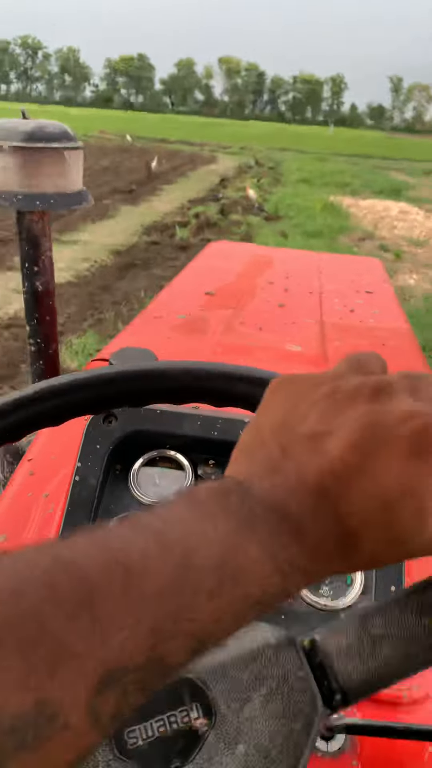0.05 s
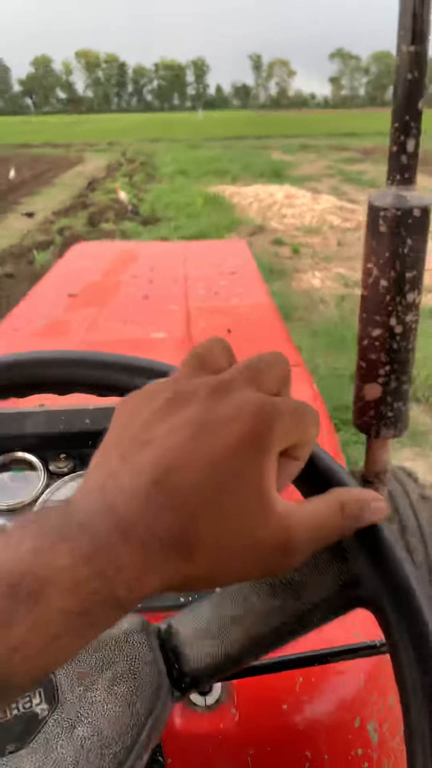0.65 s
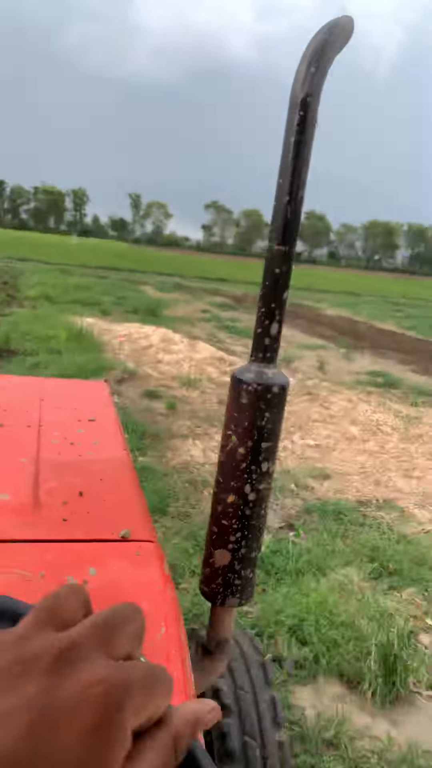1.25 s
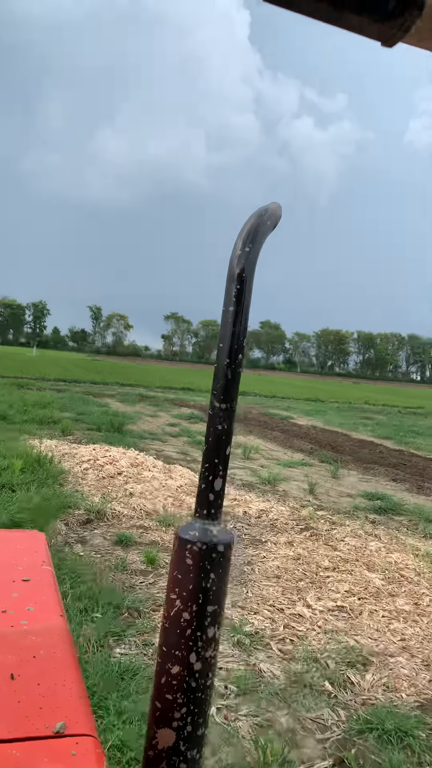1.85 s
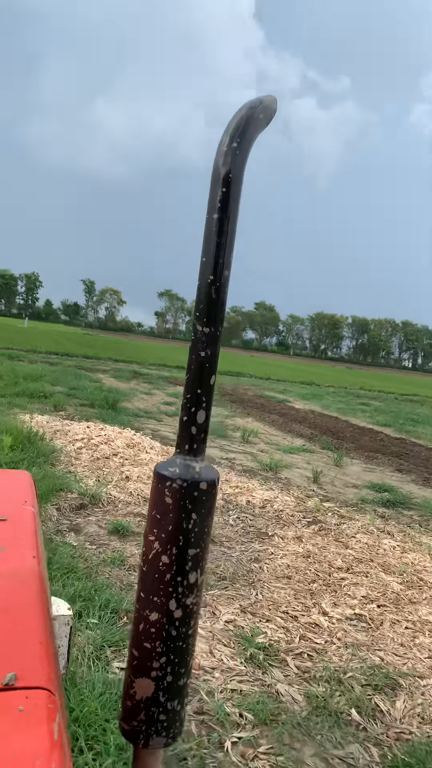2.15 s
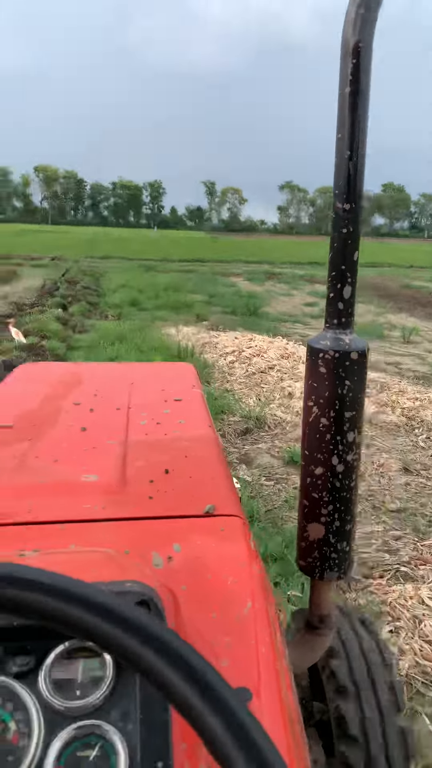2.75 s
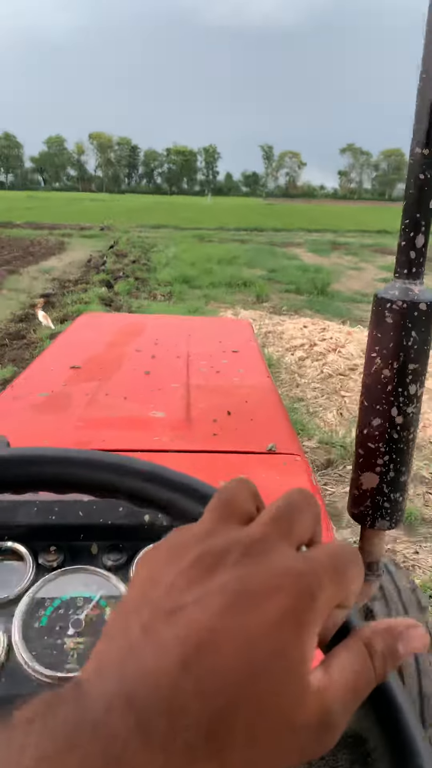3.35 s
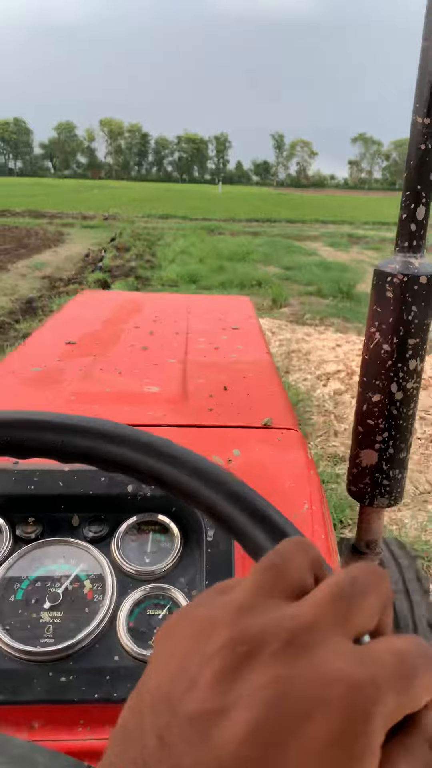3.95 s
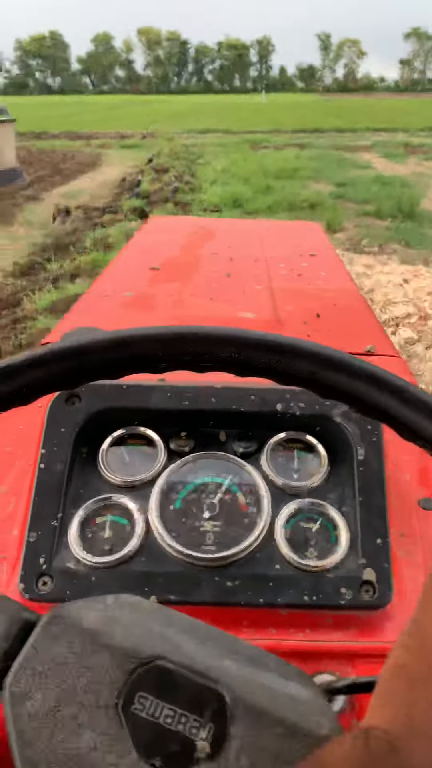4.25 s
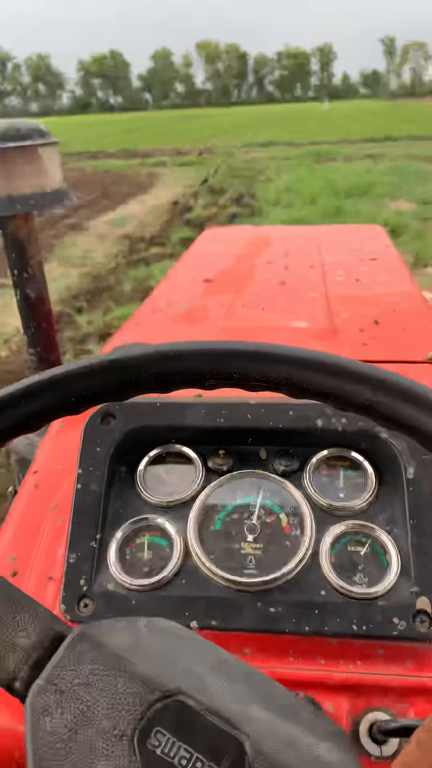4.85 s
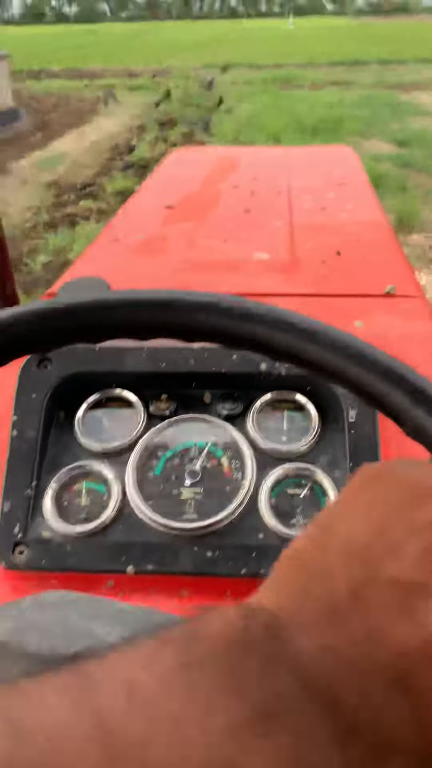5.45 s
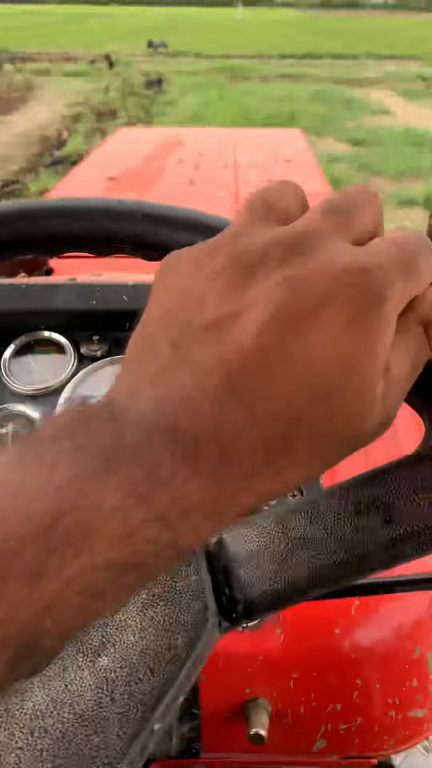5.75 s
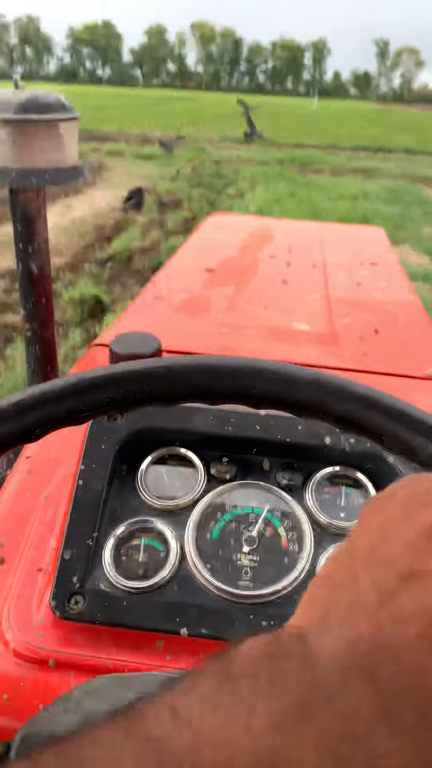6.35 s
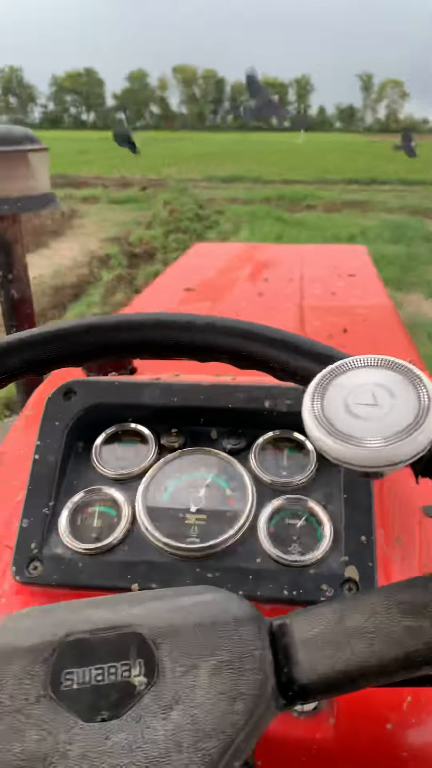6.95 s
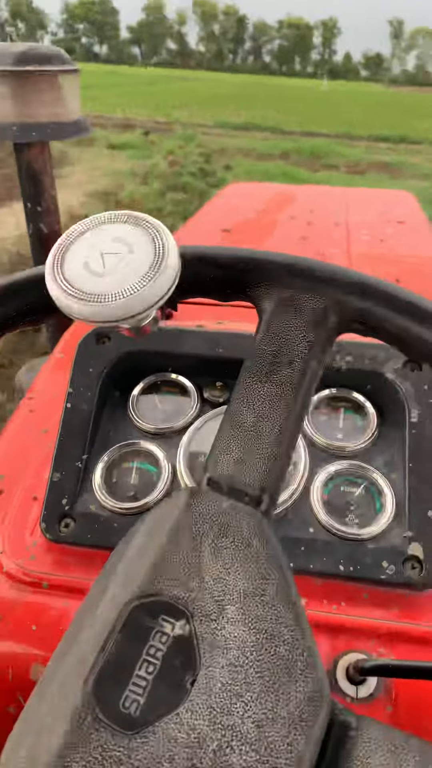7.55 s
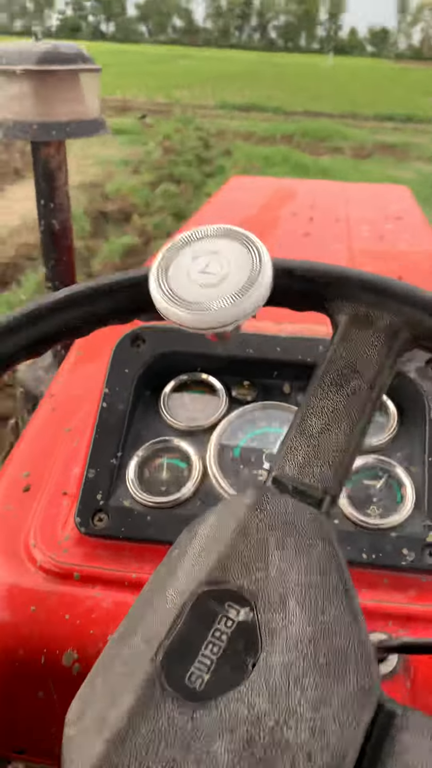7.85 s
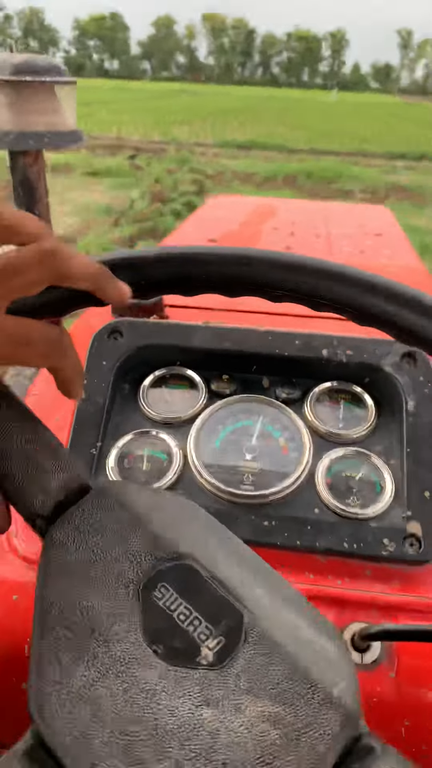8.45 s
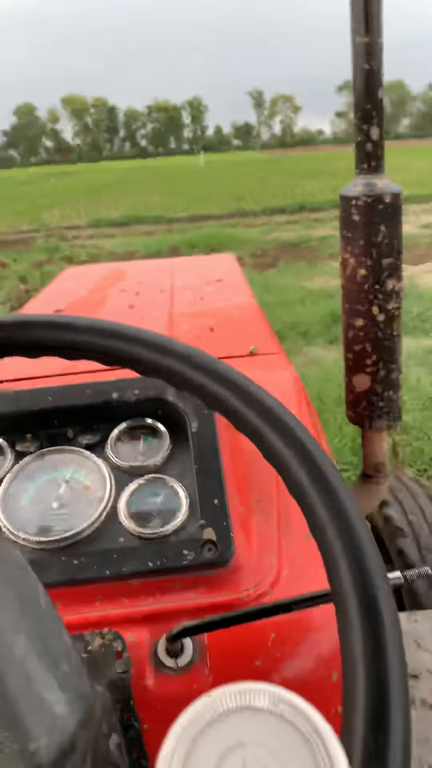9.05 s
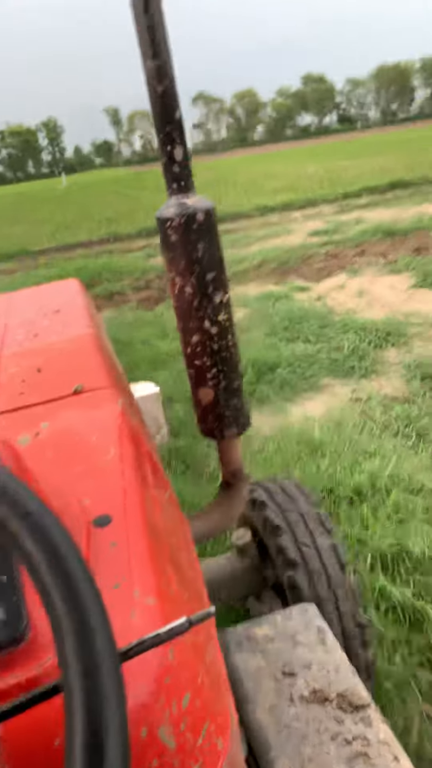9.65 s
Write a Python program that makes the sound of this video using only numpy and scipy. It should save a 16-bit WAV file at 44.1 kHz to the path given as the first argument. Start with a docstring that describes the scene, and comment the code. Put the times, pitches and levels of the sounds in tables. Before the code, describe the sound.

Close to the driver's seat in an open field, a diesel tractor engine chugs and clatters. Its note falters and sags, then the exhaust turns hard and raspy as the speed recovers. It settles into a steady pull broken by short drops and swells. Loose metal parts clink and knock, mostly in the second half, and underneath are the rush of the cooling fan and the low rumble of a harrow in the soil.

```python
"""A two-cylinder diesel tractor pulls a harrow over a field, on two close microphones at the seat.
Ahead, the upright exhaust booms on every firing; as the governor opens up it barks, spits and rings.
In the fuel cuts it falls quiet, leaving the block's clatter, the fan, gear whine and the engine's hum.
Loose tinwork rattles nearby, and behind the seat the harrow's discs thud and scrape through the soil."""
import sys
import numpy as np
from scipy import signal
from scipy.fft import rfft, irfft, next_fast_len
from scipy.io import wavfile
from scipy.ndimage import uniform_filter1d

SR = 44100
rng = np.random.default_rng(int(sys.argv[2]) if len(sys.argv) > 2 else 0)


def output_pcm(signal):
    """Save a mono or channel-first signal as 16-bit PCM at the path in sys.argv[1].

    Samples are clipped to [-1, 1] before scaling.
    """
    pcm = np.clip(np.atleast_2d(signal).T, -1, 1) * 32767
    wavfile.write(sys.argv[1], SR, np.round(pcm).astype(np.int16))


N = 428199
TIME = np.arange(N) / SR
FFT_SIZE = next_fast_len(N + 8192, True) // 2 * 2
HZ = np.fft.rfftfreq(FFT_SIZE, 1 / SR)

# discs in the soil behind the seat: time_s, rumble_db, hiss_db
HARROW_LEVELS = [(0, -30, -47), (3.7, -33, -43), (4.4, -28, -50), (6.2, -27, -54), (7, -33, -55),
                 (7.8, -27, -45), (8.6, -29.5, -45), (9.2, -29, -43), (9.71, -55, -38)]
# tone of the clods and of the grit: freq_hz, gain_db
CLOD_SPECTRUM = [(100, -26), (230, 8.5), (340, 3), (600, -4.5), (1200, -21), (5000, -59)]
GRIT_SPECTRUM = [(1000, -27), (2600, -28), (5000, -28), (9500, 15), (13000, 24)]
# linkage and tinwork shaken by rough ground: time_s, level_db
JINGLE_LEVELS = [(0, -34), (3.5, -38.5), (4.3, -33.5), (5.2, -37), (6.1, -32), (8.3, -33), (9.71, -30)]
# loose pins and tinwork: pitch_hz
PIN_PITCHES = [1340, 1450, 1540, 1664, 1797, 1900, 2020, 2096, 2150, 2230]
# loose metal knocking as the tractor jolts: start_s, level_db, pitch_hz, t60_s
METAL_RATTLES = [(.057, -12, 2000, 0.016), (4.338, -21, 2100, 0.094), (5.266, -19, 1970, 0.13),
                 (5.858, -25, 2190, .08), (6.099, -18, 2020, .08), (6.154, -16, 1980, 0.07),
                 (6.199, -17, 2210, 0.093), (6.252, -15, 2120, .08), (6.454, -20.5, 1920, .08),
                 (6.638, -17, 2120, .08), (6.684, -19, 2100, .08), (7.012, -20, 2130, .08),
                 (7.278, -21, 2130, .1), (8.325, -18, 1950, 0.12), (8.428, -20, 2040, .05),
                 (9.007, -22, 2150, .04)]
# a dry joint chirping: start_s, level_db, pitch_hz, t60_s
JOINT_SQUEAKS = [(5.338, -26.5, 4680, 0.1)]
# dry clacks of hard exhaust firings as the engine takes up the load: start_s, level_db, centre_hz, t60_s
EXHAUST_CLACKS = [(.821, -23, 8000, .04), (.826, -23, 9000, .05), (.875, -29, 7500, .06),
                  (1.114, -28, 9000, .06), (1.423, -26, 9000, .05)]
# dull bumps under the seat: start_s, level_db, pitch_hz, decay_s
CHASSIS_BUMPS = [(3.86, -9, 114, 0.0076), (4.262, -14.5, 204, .009)]
# air from the cooling fan: freq_hz, gain_db
FAN_SPECTRUM = [(200, -13), (1500, 5.5), (3500, 8.5), (5000, 0.5), (7500, 4), (13000, -2.5)]
# tones of the running gear: pitch_hz, level_db
GEAR_WHINES = [(7731, -62), (3566, -58.5)]
# hum of the reciprocating masses: crank_multiple, level_db
SHAKE_ORDERS = [(1, -37), (2, -50.5), (3, -31), (5, -30.5), (6, -35.5)]
# clatter before the fuel raises or lowers it: time_s, level_db
CLATTER_LEVELS = [(0, -22.5), (1.9, -21), (3.3, -22.5), (5.4, -21.5), (7, -23), (9.71, -20.5)]
# tone of block and transmission: freq_hz, gain_db
BLOCK_SPECTRUM = [(20, -44), (42, 9), (100, 12.5), (150, 7.5), (220, 7), (320, 1.5), (460, -2), (680, 0.5),
                  (900, -1), (1200, 1.5), (1700, -4.5), (2250, -7), (2550, -8.5), (3000, -14),
                  (6000, -17.5), (15000, -40)]
# ringing castings and panels: pitch_hz, width_hz, boost_db
PANEL_MODES = [(2130, 90, 8), (2618, 50, 5.5), (3560, 25, 9)]
# crank speed the governor holds while it feeds fuel, one firing a turn: time_s, speed_hz
CRANK_SPEEDS = [(0, 42.242), (.6, 39.781), (1, 40.217), (1.8, 34.615), (2.2, 36.181), (2.4, 38.571),
                (2.8, 41.233), (3, 43.514), (4, 43.796), (4.8, 42.473), (5.6, 42.201), (5.8, 40.87),
                (7.4, 39.949), (7.6, 41.508), (8, 40.929), (8.2, 42.784), (8.4, 40.163), (9.71, 41.203)]
# the engine coasts: start_s, end_s, share_cut
FUEL_CUTS = [(.03, .13, 1), (.7, .82, 1), (.92, 1.06, 1), (1.21, 1.34, 1), (1.48, 1.63, 1), (1.78, 1.94, 1),
             (4.225, 4.35, .56), (4.5, 4.72, 1), (5.11, 5.21, 1), (5.42, 5.53, 1), (6.31, 6.45, 1),
             (7.63, 7.73, 1), (8.14, 8.3, 1)]
# the governor opens up: start_s, length_s, rasp_db, fade_s
GOVERNOR_SURGES = [(0.133, 0.21, -36, 0.091), (0.494, 0.23, -37, .06), (0.797, .12, -35.5, 0.018),
                   (1.068, 0.11, -32.5, 0.031), (1.33, 0.14, -32.5, .04), (1.608, 0.17, -31.5, 0.019),
                   (1.924, 1.17, -29, 0.041), (4.343, 0.17, -40, 0.07), (4.718, .35, -33.5, 0.056),
                   (5.168, 0.23, -35, 0.055), (5.504, .24, -32.5, 0.054), (5.798, 0.24, -34, 0.11),
                   (6.126, 0.18, -34, 0.058), (6.441, 0.29, -35, 0.044), (7.403, 0.24, -33, 0.072),
                   (7.873, 0.29, -36.5, 0.089), (8.471, 0.23, -36.5, 0.057), (8.87, 0.17, -38.5, 0.049)]
# steady pull of the harrow between surges: time_s, fuel_db, rasp_db
STEADY_LOAD = [(0, -18, -38.5), (1.8, -21, -65.5), (3.1, -18, -38.5), (4.15, -18, -44.5), (5.8, -19.5, -49),
               (6.9, -18, -40), (7.3, -19, -45), (8.4, -19.5, -60), (9.25, -18.5, -40), (9.71, -19, -41.5)]
# the hardest firings spit at the lip, then knock in the pipe: start_s, spit_db, spit_hz, knock_db
HARD_BLOWS = [(.822, -27, 7000, -27), (.874, -30, 7600, -28), (1.114, -29, 7000, -28),
              (1.396, -25, 7900, -28), (1.629, -23, 6400, -26.5), (1.688, -21, 7300, -23.5),
              (1.718, -30, 7800, -22), (1.964, -15.5, 6900, -26), (2.057, -24, 8000, -22),
              (2.142, -17, 7900, -22), (2.198, -17, 7400, -25), (2.227, -18, 8000, -23),
              (2.281, -17, 7300, -25), (2.334, -23, 7800, -22.5), (2.388, -18, 7900, -22),
              (2.439, -17, 7500, -22.5), (4.947, -19, 7700, -34), (6.661, -19, 7300, -33)]
# crack of a hard blowdown: freq_hz, gain_db
CRACK_SPECTRUM = [(150, -30), (400, -4.5), (620, -2), (900, -9.5), (1300, -6), (2000, -6), (2500, -8),
                  (3000, -22), (6000, -24), (16000, -45)]
# resonances of the exhaust pipe: pitch_hz, width_hz, boost_db
PIPE_MODES = [(785, 34, 18), (1125, 24, 25), (1490, 60, 10), (1790, 60, 10)]
# sizzle at the stack's lip: pitch_hz, width_hz, gain_db
LIP_MODES = [(7700, 25, 10), (8000, 130, 7), (8540, 170, 1)]
# jet noise of the exhaust: freq_hz, gain_db
JET_SPECTRUM = [(100, -19), (250, -8.5), (340, 12), (450, 12), (620, 8), (900, 0), (1350, 0), (1800, 6.5),
                (2150, 5.5), (2500, 1), (3000, -2), (5000, -8.5), (7000, -4.5), (8200, -4.5), (10000, -15),
                (14000, -5), (16000, -43)]
# low response of silencer and stack: freq_hz, gain_db
SILENCER_SPECTRUM = [(20, -16.5), (40, -71.5), (62, 3), (80, 1), (94, 10), (108, 0), (122, -8), (136, -11),
                     (165, -16.5), (205, -13.5), (245, -24.5), (290, -25.5), (450, -33.5), (3000, -100)]
# paths to the microphones at the seat: freq_hz, coherence, right_lag_rad, left_minus_right_db
STACK_TO_MICS = [(80, 1, -.36, -1.6), (140, .95, -.38, -3), (215, .95, 0, -6.5), (320, .8, .7, -.5),
                 (480, .75, .3, -3), (780, .65, -.5, 7), (1120, .65, -2, 1), (1650, .45, -1.6, -4),
                 (2150, .9, .6, -1), (2380, .85, 1.15, -1), (2700, .85, .1, 0), (3900, .2, -1.5, 0),
                 (4900, .8, -3.14, -1), (7500, .92, -3.14, 0), (14000, .8, -3.14, 0)]
ENGINE_TO_MICS = [(50, .9, -.1, 0), (130, .7, -.1, -3), (230, .65, .5, -5), (340, .8, 1, -1),
                  (560, .72, .7, -2), (850, .65, .3, 3), (1200, .2, -.5, -1), (1650, .55, -1.4, -2),
                  (2100, .75, .3, -3), (3100, .5, .2, 0), (3900, .25, -1.7, 1), (4900, .65, -3.14, -1),
                  (7500, .8, -3.14, 0), (14000, .7, -3.14, 0)]
# how a source divides on its way to the microphones: direct_gain, scattered_gain
DIRECT, MOSTLY_DIRECT = np.array([[1], [0]]), np.array([[1], [.5]])

USUAL_SPEED_HZ = 40  # below this the engine lugs


def amp(db):
    """Decibels to gain."""
    return np.exp(np.asarray(db) * (np.log(10) / 20))


def unit_rms(x):
    """Scales x to an rms of 1."""
    return x / np.sqrt(np.mean(x ** 2) + 1e-20)


def gate(db, onset_db, steepness):
    """Soft switch from 0 to 1, half open at onset_db."""
    return 1 / (1 + amp(steepness * (onset_db - db)))


def over_time(rows, column=1):
    """One column of a table, joined by straight lines over time."""
    rows = np.asarray(rows)
    return np.interp(TIME, rows[:, 0], rows[:, column])


def over_frequency(rows, column=1):
    """One column of a table, joined over log frequency."""
    rows = np.asarray(rows)
    return np.interp(np.log(HZ + 1), np.log(rows[:, 0] + 1), rows[:, column])


def drift(rate_hz):
    """A random wander of about unit size."""
    knots = rng.standard_normal(4096)
    return np.interp(TIME * rate_hz, np.arange(len(knots)), knots)


def response(spectrum, modes=()):
    """Minimum-phase filter from a smooth spectrum with resonances standing on it."""
    power = 1 + sum(amp(db) ** 2 / (1 + (2 * (HZ - hz) / width) ** 2) for hz, width, db in modes)
    cepstrum = irfft(np.log(amp(over_frequency(spectrum)) * np.sqrt(power)))
    cepstrum[1:FFT_SIZE // 2] *= 2
    cepstrum[FFT_SIZE // 2 + 1:] = 0
    return np.exp(rfft(cepstrum))


def colour(x, gain):
    """Filters x by a gain for every frequency."""
    return irfft(rfft(x, FFT_SIZE) * gain)[..., :N]


def resonate(x, hz, width_hz):
    """A resonance of gain 1 that follows the curve hz."""
    carrier = np.exp(2j * np.pi * np.cumsum(hz) / SR)
    pole = np.exp(-np.pi * width_hz / SR)
    return 2 * (carrier * signal.lfilter([1 - pole], [1, -pole], x / carrier + 1e-18)).real


def pulses(turns, at, uneven):
    """One click a turn, at the crank position `at`."""
    clicks = np.zeros(N + 1)
    where = np.searchsorted(turns, np.arange(1, 512) + at % 1)
    clicks[where] = 1 + uneven * rng.standard_normal(len(where))
    return clicks[:N]


def puffs(turns, at, rise, fall, uneven_db):
    """One puff a turn, no two equally strong; at, rise and fall are in turns."""
    phase = (turns - at) % 1
    sizes = amp(uneven_db * np.clip(rng.standard_normal(1024), -2, 2))
    size = sizes[np.floor(turns - at).astype(int)]
    return unit_rms(size * (1 - np.exp(-phase / rise)) * np.exp(-phase / fall))


def harrow():
    """Behind the seat, discs thud through clods and scrape on grit."""
    noise = rng.standard_normal((2, N))
    clods = unit_rms(colour(noise * amp(.89 * drift(rate_hz=36)), response(CLOD_SPECTRUM)))
    grit = unit_rms(colour(noise * amp(2 * drift(rate_hz=220)), response(GRIT_SPECTRUM)))
    return clods * amp(over_time(HARROW_LEVELS, 1)) + grit * amp(over_time(HARROW_LEVELS, 2))


def jingle(clinks_per_pin_hz=15, t60_s=.084, spread_db=2, detune=.015):
    """Loose pins and panels clink at random, never twice at quite the same pitch."""
    t = np.arange(SR // 6) / SR
    out = np.zeros((2, N + len(t)))
    fade = amp(-60 * t / t60_s)
    for pin, hz in enumerate(PIN_PITCHES):
        waits, sizes = rng.exponential(size=(2, 240))
        starts = (np.cumsum(waits) / clinks_per_pin_hz * SR).astype(int)
        gains = amp(spread_db * np.minimum(sizes, 2.5))
        pitches = hz * (1 + detune * rng.standard_normal(240))
        for start, gain, pitch in zip(starts, gains, pitches):
            if start < N:
                out[pin % 2, start:start + len(t)] += gain * fade * np.sin(2 * np.pi * pitch * t)
    return unit_rms(out[:, :N]) * amp(over_time(JINGLE_LEVELS))


def noise_bursts(rows, relative_width):
    """Short dying bursts: narrow ones ring or chirp, broad ones are a hard exhaust firing's dry clack."""
    out, t = np.zeros((2, N)), np.arange(SR // 5) / SR
    for start_s, db, hz, t60_s in rows:
        band = signal.iirpeak(hz, 1 / relative_width, SR)
        noise = unit_rms(signal.lfilter(*band, rng.standard_normal((2, len(t)))))
        span = out[:, round(start_s * SR):][:, :len(t)]
        span += (noise * amp(db - 60 * t / t60_s))[:, :span.shape[1]]
    return out


def chassis_bumps():
    """Under the seat, the chassis drops into a rut and thumps briefly."""
    out = np.zeros(N)
    for start_s, db, hz, decay_s in CHASSIS_BUMPS:
        t = np.maximum(TIME - start_s, 0)
        out += amp(db) * t / decay_s * np.exp(1 - t / decay_s) * np.sin(2 * np.pi * hz * t)
    return out


def fan(level_db=-42):
    """Up front, the cooling fan rushes on through the fuel cuts."""
    air = unit_rms(colour(rng.standard_normal((2, N)), response(FAN_SPECTRUM)))
    return air * amp(level_db + .8 * drift(rate_hz=230))


def gear_whine():
    """Thin wavering tones from the running gear."""
    out = np.zeros(N)
    for hz, db in GEAR_WHINES:
        gain = amp(db + 2.6 * drift(rate_hz=26))
        pitch_hz = hz + 9 * drift(rate_hz=250)
        out += gain * np.sin(2 * np.pi * np.cumsum(pitch_hz) / SR)
    return out


def fuel_cut():
    """Share of the fuel that is cut: 0 while it flows freely."""
    return sum(share * ((TIME > start) & (TIME < end)) for start, end, share in FUEL_CUTS)


def crank(sag_hz_per_s=33.6, recover_s=.15, start_turn=.36):
    """Turns of the crankshaft: it loses speed in every fuel cut and soon wins it back."""
    sag_hz = signal.lfilter([sag_hz_per_s / SR], [1, -np.exp(-1 / (recover_s * SR))], fuel_cut())
    return start_turn + np.cumsum(over_time(CRANK_SPEEDS) - sag_hz) / SR


def lugging(turns):
    """How far the crank has dropped below its usual speed, in Hz."""
    return USUAL_SPEED_HZ - np.gradient(turns) * SR


def surge(start_s, length_s, db, fade_s, arch_db=4.5):
    """One opening of the governor: a swell, an arch, a fade."""
    t = np.clip(TIME - start_s, 0, length_s)
    ramp = np.minimum(np.minimum(t, length_s - t) / fade_s, 1)
    return ramp * amp(db - arch_db * (2 * t / length_s - 1) ** 2)


def governor(fuel_cut_db=-6, rasp_cut_db=-2.5, cut_edge_s=.03, surge_share=.12):
    """Strength of firings and exhaust rasp in dB: the steady load, raised by surges, dropped by cuts."""
    steady_fuel_db, steady_rasp_db = over_time(STEADY_LOAD, 1), over_time(STEADY_LOAD, 2)
    cut = uniform_filter1d(fuel_cut(), size=round(cut_edge_s * SR))
    surge_power = sum(surge(*row) ** 2 for row in GOVERNOR_SURGES)
    rasp_db = 10 * np.log10(amp(steady_rasp_db + rasp_cut_db * cut) ** 2 + surge_power)
    extra_db = surge_share * np.maximum(rasp_db - steady_rasp_db, 0)
    return steady_fuel_db + extra_db + fuel_cut_db * cut, rasp_db


def engine_shake(turns, waver_db=4):
    """The reciprocating masses hum on, fuel or no fuel."""
    out = np.zeros(N)
    for multiple, db in SHAKE_ORDERS:
        gain = amp(db + waver_db * np.tanh(drift(rate_hz=11)))
        out += gain * np.sin(2 * np.pi * multiple * turns + .5 * drift(rate_hz=3.7))
    return out


def metal_ripple(width_hz=32, depth_db=8):
    """A metal body has countless small peaks and dips in its response."""
    knots = np.minimum(rng.standard_normal(4096), 1.4)
    return amp(depth_db * np.interp(HZ / width_hz, np.arange(len(knots)), knots))


def gear_strikes(turns):
    """Gear teeth and tappets strike at the same twelve crank positions on every turn."""
    return unit_rms(sum(pulses(turns, at, uneven=.5) * rng.choice([-1, 1]) for at in rng.random(12)))


def clatter(turns, fuel_db, fuel_share=.66, ticks_per_s=260, tick_db=-7):
    """Just ahead, combustion knock, valve gear and small ticks shake the block, harder with more fuel."""
    knock = puffs(turns, at=.15, rise=.06, fall=.25, uneven_db=3.5)
    valves = puffs(2 * turns, at=.4, rise=.03, fall=.15, uneven_db=4.5)
    beat = 1 + .29 * knock + .1 * valves
    ticking = rng.random((2, N)) < ticks_per_s / SR
    sizes = amp(.83 * np.minimum(rng.exponential(1, (2, N)), 4))
    ticks = unit_rms(ticking * sizes * rng.choice([-1, 1], (2, N)))
    gear_band = HZ ** 4 / (HZ ** 4 + 260 ** 4) / (1 + (HZ / 2600) ** 4)
    gears = colour(np.array([gear_strikes(turns), gear_strikes(turns)]), gear_band)
    drive = beat * (rng.standard_normal((2, N)) + amp(tick_db) * ticks + .4 * gears)
    level_db = over_time(CLATTER_LEVELS) + fuel_share * (fuel_db + 17) + drift(rate_hz=14)
    # the fine colour shifts as the microphones sway over the bonnet
    block = response(BLOCK_SPECTRUM, PANEL_MODES)
    midrange = HZ / (HZ + 250) / (1 + (HZ / 3000) ** 2)
    positions = [unit_rms(colour(drive, block * metal_ripple() ** midrange)) for _ in range(5)]
    weights = np.array([amp(14 * drift(rate_hz=3)) for _ in positions])
    blend = sum(sound * share for sound, share in zip(positions, weights / weights.sum(0)))
    return unit_rms(blend) * amp(level_db)


def firings(turns, rasp_db, lug_db_per_hz=.4, centre_hz=7700, scatter_hz=350):
    """One firing a turn, knocking harder as the engine lugs: start_s, spit_db, spit_hz, knock_db."""
    at = np.flatnonzero(pulses(turns, at=0, uneven=0))
    size, pitch, force = np.clip(rng.standard_normal((len(at), 3)), -2, 1.5).T
    flow_db = rasp_db[at]
    effort_db = flow_db + lug_db_per_hz * lugging(turns)[at]
    spit_db = flow_db + 5 + 3.5 * size + 20 * np.log10(gate(flow_db, onset_db=-28, steepness=3))
    knock_db = effort_db + 4.5 + 1.2 * force + 20 * np.log10(gate(effort_db, onset_db=-35, steepness=3))
    regular = np.transpose([at / SR, spit_db, centre_hz + scatter_hz * pitch, knock_db])
    # a hard blow takes the place of any firing within about half a turn
    hard = np.array(HARD_BLOWS)
    gap_s = abs(regular[:, :1] - hard[:, 0]).min(1)
    return np.vstack([regular[gap_s > .5 / USUAL_SPEED_HZ], hard])


def exhaust_spits(fired, rise_hz_per_s=70000, swell_s=.0022, rough_rad=.27):
    """A strong firing opens with a brief rising whistle at the stack's lip, each at its own pitch."""
    t = np.arange(SR // 50) / SR
    out = np.zeros(N + len(t))
    swell = t / swell_s * np.exp(1 - t / swell_s)
    for start_s, db, hz, _ in fired:
        start = int(start_s * SR)
        phase = 2 * np.pi * np.cumsum(hz + rise_hz_per_s * t) / SR
        jitter = rough_rad * np.cumsum(rng.standard_normal(len(t)))
        out[start:start + len(t)] += amp(db) * swell * np.sin(phase + jitter)
    return out[:N]


def exhaust_yelps(turns, fired, gain_db=4, usual_hz=2620, fall_hz_per_s=62000, rough_rad=.06):
    """Just before each knock the escaping gas gives a short falling yelp as its pressure drops."""
    t = np.arange(SR // 64) / SR
    out = np.zeros(N + len(t))
    swell = np.exp(-((t - .0045) / .003) ** 2)
    tuning = 1 - .012 * lugging(turns)
    for start_s, _, _, knock_db in fired:
        start = int(start_s * SR)
        start_hz = usual_hz * (tuning[start] + .03 * rng.standard_normal())
        phase = 2 * np.pi * np.cumsum(start_hz - fall_hz_per_s * t) / SR
        jitter = rough_rad * np.cumsum(rng.standard_normal(len(t)))
        out[start:start + len(t)] += amp(knock_db + gain_db) * swell * np.sin(phase + jitter)
    return out[:N]


def pipe_ring(turns, fired, lag_s=.0065, tear_s=.006, flat_per_hz=.004, waver=.012):
    """Under load each firing hammers the pipe: a crack, a short tearing and a hollow metallic ring."""
    blows = np.zeros(N)
    at = np.minimum((fired[:, 0] + lag_s) * SR, N - 1).astype(int)
    blows[at] = amp(fired[:, 3]) * np.sqrt(N / turns[-1])
    tearing = signal.lfilter([np.sqrt(2 / (tear_s * SR))], [1, -np.exp(-1 / (tear_s * SR))], blows)
    drive = .41 * MOSTLY_DIRECT * blows + .93 * tearing * rng.standard_normal((2, N))
    crack = colour(drive, response(CRACK_SPECTRUM))
    tuning = 1 - flat_per_hz * lugging(turns)
    ring = sum(amp(db) * resonate(crack, hz * (tuning + waver * drift(rate_hz=30)), width_hz)
               for hz, width_hz, db in PIPE_MODES)
    return unit_rms(crack + ring) * np.std(blows)


def exhaust_bark(turns, rasp_db, jet_gain_db=5, crossover_hz=3200):
    """Gas tears out of the stack ahead of the seat: a sharp hiss first, then a crack and a rush."""
    hiss = puffs(turns, at=.0049, rise=.02, fall=.73, uneven_db=3) * amp(drift(rate_hz=380))
    rush = puffs(turns, at=.046, rise=.078, fall=.44, uneven_db=2)
    # the crack and its echoes in the pipe repeat with every firing
    shock = unit_rms(sum(size * pulses(turns, at, uneven=.27)
                         for at, size in [(.08, .92), (.17, -.9), (.25, .8), (.38, -.6)]))
    noise = rng.standard_normal((2, N))
    gas = .59 * noise * rush + .22 * MOSTLY_DIRECT * shock
    tone, low = response(JET_SPECTRUM), 1 / (1 + (HZ / crossover_hz) ** 4)
    jet = unit_rms(colour(noise * hiss, tone * (1 - low)) + colour(gas, tone * low))
    lip = sum(amp(db) / (1 + 2j * (HZ - hz) / width_hz) for hz, width_hz, db in LIP_MODES)
    sizzle = unit_rms(colour(rng.standard_normal((2, N)) * hiss, lip))
    # the jet only tears once the flow is fast enough, and sizzles when it is faster still
    jet *= gate(rasp_db, onset_db=-45, steepness=3.15)
    sizzle *= gate(rasp_db, onset_db=-34, steepness=6.5)
    return (jet * amp(jet_gain_db) + sizzle) * amp(rasp_db)


def exhaust_boom(turns, fuel_db, intake=.18, gain_db=3):
    """Each firing sends a pressure pulse through the silencer; the intake sucks half a turn later."""
    push = pulses(turns, at=.115, uneven=.017) - intake * pulses(turns, at=.623, uneven=.07)
    wave = colour(push - push.mean(), response(SILENCER_SPECTRUM))
    power = uniform_filter1d(uniform_filter1d(wave ** 2, size=6000), size=6000)
    firing = gate(fuel_db, onset_db=-24, steepness=3)  # too little fuel and the firings die away
    return wave / np.sqrt(power + 1e-12) * firing * amp(fuel_db + gain_db)


def microphones(sound, path, right_delay_s=1 / 4800):
    """Direct and scattered sound reach the close pair at the seat with their own phase and balance."""
    direct, scattered = rfft(sound, FFT_SIZE)
    coherence = over_frequency(path, 1)
    lag = np.exp(-1j * (over_frequency(path, 2) + 2 * np.pi * HZ * right_delay_s))
    lean = amp(over_frequency(path, 3) / 2)
    right = (coherence * direct + np.sqrt(1 - coherence ** 2) * scattered) * lag
    return irfft(np.array([direct * lean, right / lean]))[:, :N]


def scene():
    """From the seat: stack and engine ahead, both driven by the crankshaft, and the harrow behind."""
    turns = crank()
    fuel_db, rasp_db = governor()
    fired = firings(turns, rasp_db)
    stack = exhaust_bark(turns, rasp_db) + pipe_ring(turns, fired)
    stack += DIRECT * (exhaust_boom(turns, fuel_db) + exhaust_spits(fired) + exhaust_yelps(turns, fired))
    machinery = clatter(turns, fuel_db) + fan()
    machinery += DIRECT * (engine_shake(turns) + gear_whine() + chassis_bumps())
    machinery += harrow() + jingle() + noise_bursts(METAL_RATTLES, relative_width=.021)
    squeaks = noise_bursts(JOINT_SQUEAKS, relative_width=.0068)
    clacks = noise_bursts(EXHAUST_CLACKS, relative_width=.9)
    return microphones(stack, STACK_TO_MICS) + microphones(machinery, ENGINE_TO_MICS) + squeaks + clacks


def record(dry):
    """Both microphone channels roll off steeply at 14.1 kHz."""
    lowpass = signal.firwin(255, 14100, window=("kaiser", 9), fs=SR)
    return signal.oaconvolve(dry, lowpass[None], "same")


dry = scene()
out = record(dry)
output_pcm(out)
```